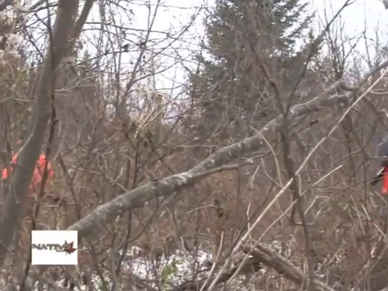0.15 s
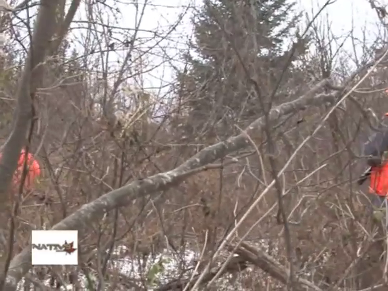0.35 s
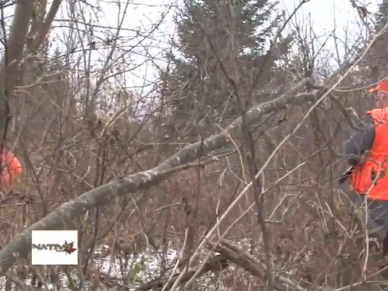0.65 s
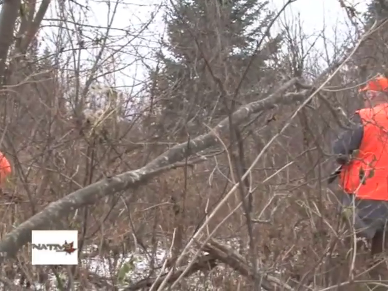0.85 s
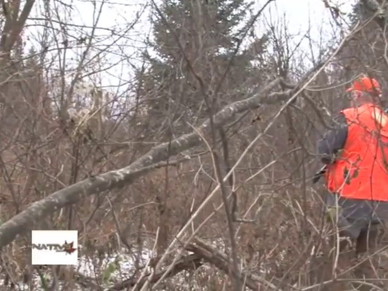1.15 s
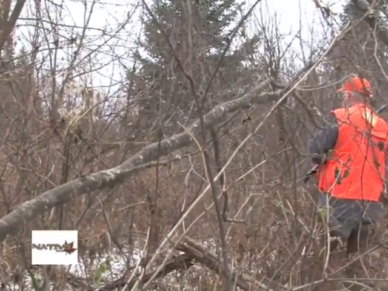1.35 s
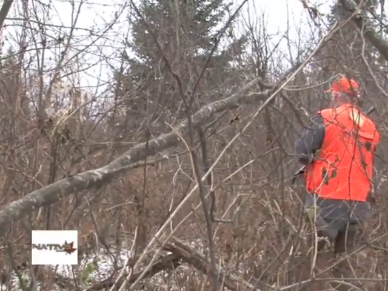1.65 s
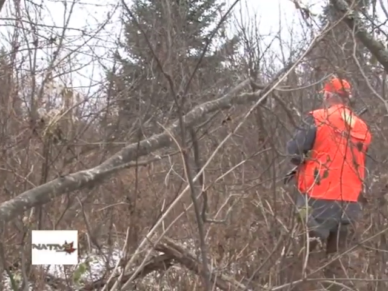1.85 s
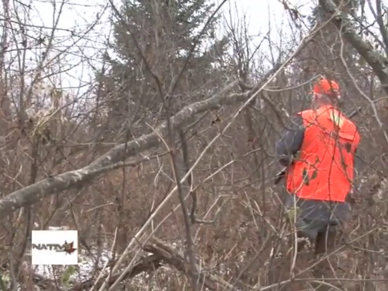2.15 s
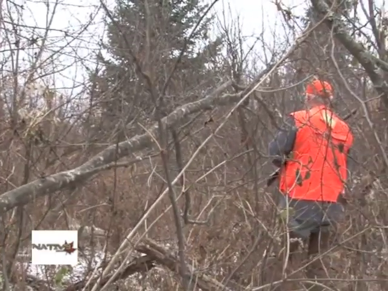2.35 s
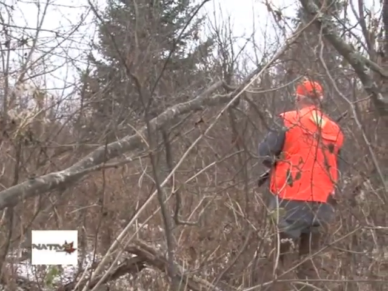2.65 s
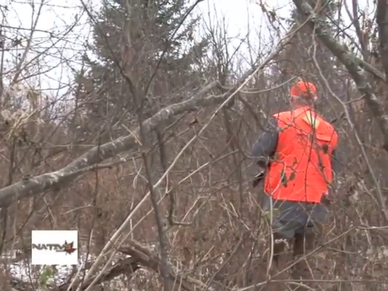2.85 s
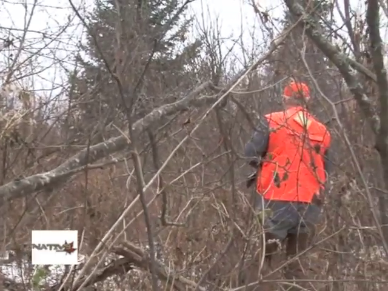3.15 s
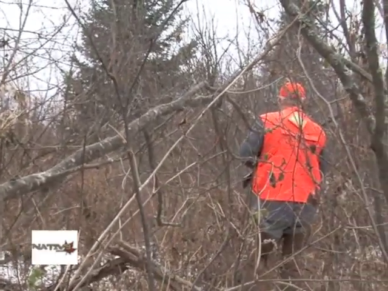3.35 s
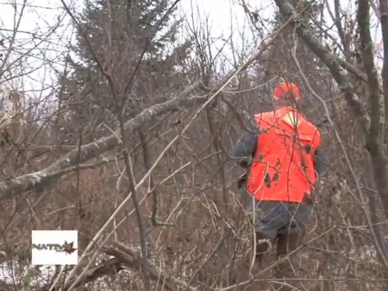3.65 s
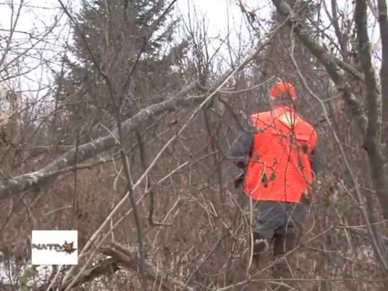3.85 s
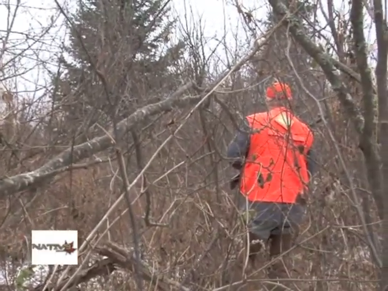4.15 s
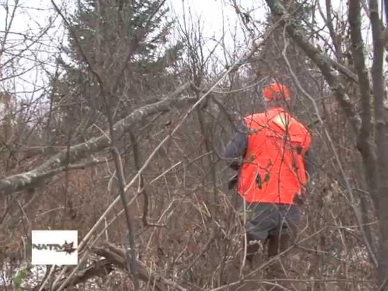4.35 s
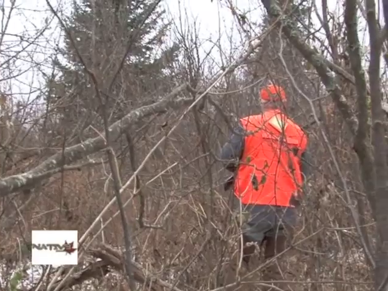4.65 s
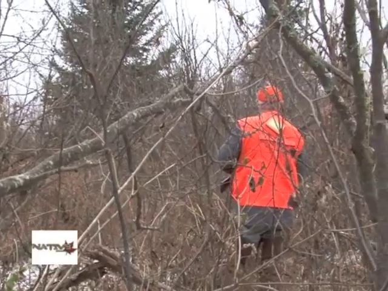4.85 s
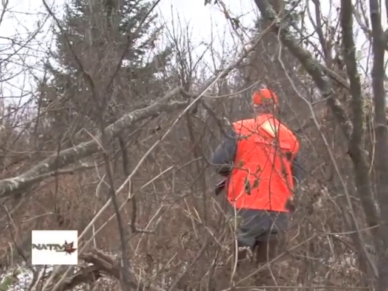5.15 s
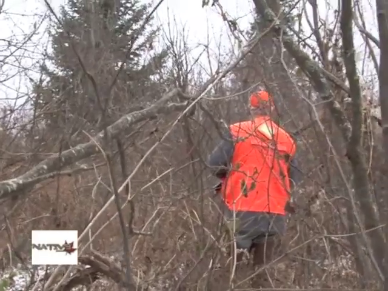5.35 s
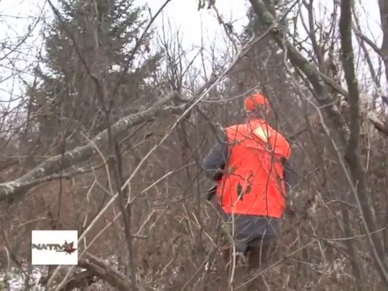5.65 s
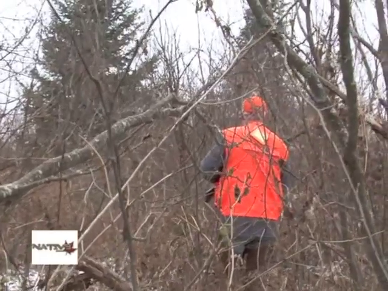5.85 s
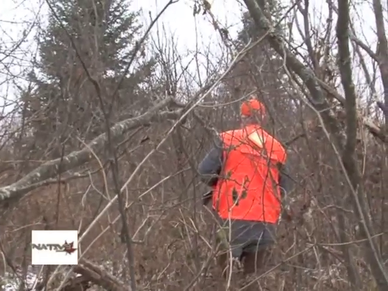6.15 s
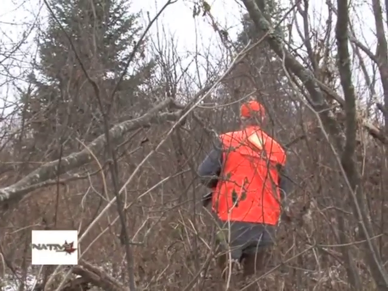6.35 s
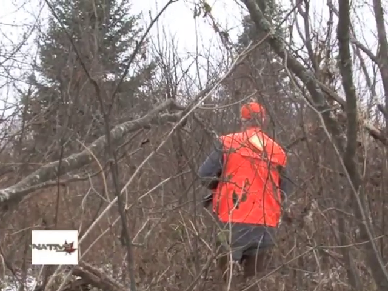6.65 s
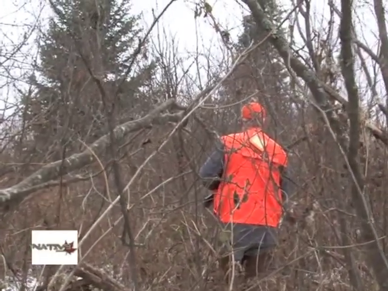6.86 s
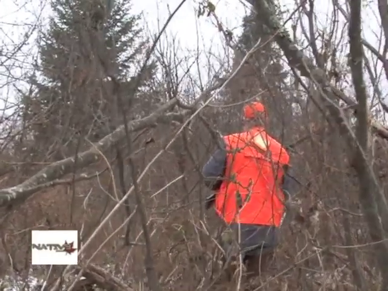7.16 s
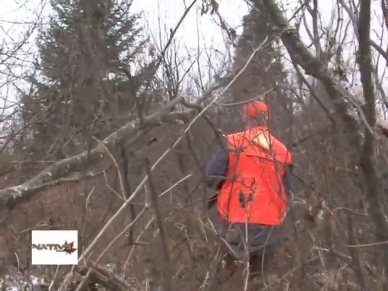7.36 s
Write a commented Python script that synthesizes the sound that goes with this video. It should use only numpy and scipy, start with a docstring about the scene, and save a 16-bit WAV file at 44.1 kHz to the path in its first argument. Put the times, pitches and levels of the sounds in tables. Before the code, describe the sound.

A soft, steady hush of air and a faint low rumble lie under a small bell worn by a dog in leafless woods. From 0 to 1.7 s the bell tinkles unevenly at moderate distance, with short metallic rings and hollow clacks; twigs snap near 0.7 and 1.5 s, and faint gliding chirps and a mid-pitched whirr pass around 0.8 to 1.5 s. From about 1.85 to 2.1 s the dog comes close: the bell clanks loudly and dry stems crackle densely. A sharp snap comes at 2.4 s, then another strong flurry of bell strikes at 2.7 to 2.9 s. After 3 s it moves away, leaving a gap near 3.7 to 4.2 s. From there to 7.5 s, thin, scattered tinkles echo off the trees, firmer near 4.8 and 6.35 s, among dull wood knocks, weak thuds, small snaps and light rustling.

```python
"""A dog wearing a small bell works through dry brush in leafless woods, over a soft hush of air and a low rumble.
At first the bell tinkles: clapper strikes ring decaying modes. Distant chirps glide and a whirr comes and goes.
About two seconds in the dog passes close by, and the bell and the crackle of tiny random fractures swell.
Then it moves off and the bell thins out. Throughout, noise bursts make the snaps of twigs,
wood knocks dully as damped tones, deep thuds swell in the rumble, and the trunks scatter the sounds as echoes."""
import sys
import numpy as np
from scipy import signal
from scipy.fft import rfft, irfft, next_fast_len
from scipy.io import wavfile
from scipy.ndimage import map_coordinates

SR = 44100
rng = np.random.default_rng(int(sys.argv[2]) if len(sys.argv) > 2 else 0)


def to_wav(s):
    """Save 16-bit WAV."""
    ch = np.atleast_2d(s).T  # columns
    pcm = np.round(np.clip(ch, -1, 1) * 32767)  # PCM
    wavfile.write(sys.argv[1], SR, pcm.astype(np.int16))


N = 331191
TIME = np.arange(N) / SR

# Levels in these tables are relative; each layer has its own trim.
# Colour of the steady air. Each row: frequency in Hz, level in dB.
AIR_COLOUR = [(25, -8.5), (80, -10), (176, -11.5), (300, -4.5), (470, -1.5), (800, -6.5), (1200, -10.5),
              (1700, -15.5), (3000, -20), (6000, -23.5), (10000, -34.5), (13500, -35), (15000, -42.5)]
# Colour of the low rumble. Each row: frequency in Hz, level in dB.
RUMBLE_COLOUR = [(20, -10), (50, -7.5), (78, 3.5), (120, -3.5), (220, -19)]
# Soft, deep thuds. Each row: start in seconds, length in seconds, level in dB.
THUDS = [(2.056, .035, -70), (2.574, .17, -70), (2.83, .035, -71), (3.11, .09, -64), (4.68, 0.046, -72),
         (5.34, 0.043, -68), (5.56, .06, -70), (5.75, 0.056, -68), (6.58, 0.031, -70), (6.92, 0.054, -72)]
# Spells of the faint whirr. Each row: start in seconds, length in seconds, level in dB.
WHIRR_SPELLS = [(.33, 0.21, -70), (.99, 0.56, -59.5), (3.08, 0.37, -63), (5.08, .63, -63),
                (7.2, .31, -64.5)]
# Colour of the whirr. Each row: frequency in Hz, level in dB.
WHIRR_COLOUR = [(800, -8), (1250, -12), (1650, 0.5), (1850, -5.5), (2300, -18.5)]
# Distant chirps, each one bent glide. Each row: start in seconds, length in seconds,
# first, middle and last pitch in Hz, level in dB.
CHIRPS = [(.838, 0.026, 1890, 1870, 1790, -60.5), (.869, 0.019, 1720, 1515, 1440, -49.5),
          (0.948, 0.029, 1440, 1430, 1520, -50), (0.967, 0.04, 1636, 1624, 1600, -49.5),
          (0.988, .028, 1650, 1352, 1140, -50), (1.342, 0.072, 1570, 1740, 1504, -61)]
# Dull woody knocks. Each row: start in seconds, level in dB.
KNOCKS = [(1.227, -43), (1.475, -44), (2.288, -44.5), (2.753, -43), (3.674, -43.5), (4.694, -46),
          (4.851, -40.5), (4.965, -45.5), (5.115, -40.5), (5.419, -39), (5.706, -43), (6.058, -42.5),
          (6.924, -51)]
# Modes of the knocked wood. Each row: frequency in Hz, level in dB, time to fall 60 dB in seconds.
WOOD_MODES = [(427, -2, 0.025), (530, 6, 0.034), (740, -7.5, 0.024), (896, -1.5, 0.036),
              (1350, -5.5, 0.023)]
# Twigs snapping. Each row: start in seconds, level in dB.
SNAPS = [(0.7244, -35), (0.734, -39), (0.884, -44), (1.517, -36), (1.58, -35), (2.0287, -32), (2.2054, -42),
         (2.439, -25), (3.119, -58), (3.4238, -34), (4.3475, -50), (4.581, -45), (4.8504, -49),
         (6.574, -43), (6.888, -45)]
# Colour of a snap. Each row: frequency in Hz, level in dB.
SNAP_COLOUR = [(500, -23.5), (1500, -17.5), (3000, -7.5), (5500, -2.5), (9000, -7.5), (14000, -28)]
# How loudly the dog pushes through the stems, greatest as it passes. Each row: time in seconds, level in dB.
PUSH = [(0.0, -73), (0.17, -80.5), (1.44, -77.5), (1.84, -69.5), (1.96, -58), (2.3, -65.5), (2.61, -63.5),
        (3.49, -73.5), (4.0, -84), (5.0, -80), (6.28, -83.5), (6.88, -78.5), (7.22, -83.5), (7.51, -84)]
# Single stems sweeping along its coat. Each row: middle in seconds, half length in seconds, level in dB.
SWISHES = [(0.72, 0.04, -70), (2.401, .015, -58), (2.656, 0.075, -58), (4.63, 0.053, -78.5),
           (6.89, 0.037, -76)]
# Colour of the crackling stems. Each row: frequency in Hz, level in dB.
STEM_COLOUR = [(700, -9.5), (1300, -5.5), (3000, -2), (5000, -1), (8000, -1.5), (10500, -8), (13000, -16.5),
               (15000, -23.5)]
# The dog's path. Each row: time in seconds, share scattered by the trees in dB, left over right in dB.
PATH = [(0, 2.5, 3), (1.3, -1.5, 2.5), (1.9, -6.5, 1.1), (2.8, -9, 0.7), (3.3, -0.5, 0.5), (4.3, -2, 1.5),
        (5.6, 7, 0), (6.3, 3, 1.5), (6.8, -2.5, 0.2), (7.5, -5, 3)]
# The clearer clapper strikes; where the clapper lands sets brightness and the second partial. Each row:
# start in seconds, ring in dB, clack above the ring in dB, brightness in dB, second partial in dB.
STRIKES = [(0.018, -48.5, 11.5, -4, 1), (0.116, -50.5, 8, -9, -3), (0.161, -57.5, -8, -8, 7),
           (0.234, -67.5, 26, 1, 12), (0.4448, -45.5, 12, 0.5, 0), (0.5018, -48, 5, -8, -1),
           (0.547, -52.5, 4, 2, 2), (0.6724, -52.5, -6, -2, -11), (0.72, -55.5, 5, -4, -4),
           (0.9208, -61, 5, -3, -4), (1.0183, -53.5, 14, -2, -10), (1.048, -53, -5, -13, 2),
           (1.1084, -53, -3, -6, -20), (1.185, -46, 11.5, -2, -4), (1.2521, -55.5, 15.5, -1, 6),
           (1.2891, -45.5, 7.5, -7.5, -1), (1.4622, -45, 1, 4.5, 3), (1.5635, -48, 8, 7, 8),
           (1.6471, -54, 15.5, -17, 13.5), (1.701, -47, 22.5, -1, 3), (1.7774, -46, 18.5, 7, -13),
           (1.7975, -47, 25, -7, 1), (1.821, -45.5, 11, 16, -5), (1.8816, -34, 16, -8, 4.5),
           (1.9006, -35.5, 20, -25, -16), (1.9055, -27.5, 14, -7, -0.5), (1.9435, -27.5, 6, -22, -9),
           (1.952, -32, 13.5, 9.5, 7), (2.0, -34, 17.5, -1, 8), (2.0698, -28, 5.5, -1, -10),
           (2.2598, -49.5, 26.5, -11, 12), (2.2838, -36, 9, -8.5, 5.5), (2.3708, -46.5, 18, 3, 10),
           (2.391, -36.5, 9, -14, -5), (2.5043, -53, 25, 23, 16.5), (2.601, -43.5, 16, -26.5, 9.5),
           (2.6836, -46.5, 12, -20, -1), (2.7055, -40.5, 9, -16, -8), (2.7411, -25.5, 10, -15.5, -3),
           (2.7761, -28.5, 12.5, -7, -5), (2.8205, -30, 18, -8.5, -1), (2.8488, -26, 11, -5.5, 0.5),
           (3.192, -45.5, -1, 13, 13.5), (3.234, -46, 12.5, 0.5, 4), (3.2808, -49, 9.5, 0.5, 4),
           (3.3993, -47.5, 14, -2, 8), (3.5092, -57.5, 11, -13, 8), (3.5903, -59, 21, 4, 10),
           (4.2421, -58.5, 12, -21, -10), (4.3473, -62.5, 17.5, 9, 5), (4.619, -61, 13.5, 8, 1),
           (4.791, -45, 10.5, 8, -1.5), (4.908, -50, 3, -5, -5), (4.9399, -54.5, 16.5, -8, 1),
           (5.0392, -57, 11, 8, -7), (5.251, -52.5, 5, -7.5, -11), (5.3141, -60, 17, -3, -3),
           (5.5096, -60, 11, 4.5, 5.5), (5.671, -54.5, 10, -9.5, -5), (5.8483, -66.5, 23.5, -22, -4),
           (6.0488, -59, 15.5, 0, 2), (6.245, -56.5, 8, -9, -7), (6.325, -46.5, 7.5, 0, -12),
           (6.362, -46.5, 7, 0, 1), (6.3808, -48.5, -8, -8, 0), (6.4188, -50.5, 8, -3, 3),
           (6.6115, -57, 11, -5, 1), (6.667, -49.5, 4.5, 4, 4), (6.951, -51, 3, -6, -13),
           (7.0465, -56.5, 14, 1, -11), (7.212, -55.5, 6, -16, -5)]
# The bell's modes in four families, lowest to highest; close pairs beat.
# Each row: frequency in Hz, level in dB, time to fall 60 dB in seconds.
LOWEST_MODES = [(2332, -23, 0.13), (2400, 1.5, 0.18), (2377, -14.5, 0.098)]
SECOND_MODES = [(4054, -0.5, 0.023), (4038, -0.5, 0.18)]
UPPER_MODES = [(5370, -3, .05), (5460, -1, .16), (5530, -5, .07), (5603, -4, .22), (6193, -11, .18),
               (6805, -12, .06), (6840, -7, .19)]
TOP_MODES = [(8735, -1, .13), (8812, -3, .11), (9685, -3, .11), (9765, -4, .1), (10420, -3, .11),
             (10510, -7, .05), (10772, -7, .11), (11640, -7, .1), (11890, -9, .1), (12890, -18, .08),
             (13585, -12, .09)]
# Colour of the clapper's short, hollow clack. Each row: frequency in Hz, level in dB.
CLACK_COLOUR = [(900, -62.5), (1550, -30.5), (1720, -18.5), (1850, -0.5), (2050, 2), (2350, 6), (2650, -10),
                (3000, -23), (4600, -25), (5400, -2.5), (6000, -16), (10000, -29), (14000, -40)]

HUSH_DB, RUMBLE_DB = -62.5, -84
HUSH_FOLLOWS = 0.098  # lift of the hush while the dog is near, dB per dB of push
THUD_ATTACK_S, THUD_RELEASE_S = 0.017, 0.03
WHIRR_ATTACK_S, WHIRR_RELEASE_S = 0.03, 0.14
SNAP_T60_S, STICK_T60_S = 0.012, 0.005
FRACTURES_PER_S, FRACTURE_SPREAD_DB = 2200, 2.8
SURGE_DB, SURGES_PER_S = 1, 18  # the rustle comes in uneven surges
RING_RISE_S = 0.00031  # a struck body takes a moment to ring fully
# how far each family of modes moves with a strike's brightness, dB per dB
LOWEST_TILT, UPPER_TILT, TOP_TILT = -0.5, 0.27, 0.3
ROLL_DB = -66.5  # light clapper touches at the dog's mean effort, before the modes' own levels
ROLL_FOLLOWS = 0.27  # dB per dB of effort
CUTOFF_HZ = 15000


def from_db(db):
    """Decibels to gain."""
    return 10 ** (np.asarray(db) / 20)


def rms_one(x):
    """Scale to unit rms."""
    return x / np.sqrt(np.mean(x ** 2) + 1e-20)


def in_time(rows):
    """Each column of a curve at every sample."""
    s, *columns = np.transpose(rows)
    return [np.interp(TIME, s, column) for column in columns]


def lowpass(x, order, hz):
    """Smooth roll-off above a frequency."""
    return signal.sosfilt(signal.butter(order, hz, fs=SR, output="sos"), x)


def highpass(x, order, hz):
    """Smooth roll-off below a frequency."""
    return signal.sosfilt(signal.butter(order, hz, "high", fs=SR, output="sos"), x)


def colour(x, spectrum, size=8192):
    """Causal (minimum-phase) filter with the given spectrum, falling away beyond its ends."""
    hz, db = np.transpose(spectrum)
    log_hz, at = np.log(np.arange(size // 2 + 1) * SR / size + 1), np.log(hz)
    outside = np.abs(log_hz - np.clip(log_hz, at[0], at[-1]))
    target_db = np.interp(log_hz, at, db) - 20 * outside
    # folding the cepstrum forward in time gives minimum phase
    cepstrum = irfft(np.log(from_db(target_db)))
    cepstrum[1:size // 2] *= 2
    cepstrum[size // 2 + 1:] = 0
    response = irfft(np.exp(rfft(cepstrum)))
    return signal.oaconvolve(x, np.array(response, ndmin=x.ndim), axes=-1)[..., :N]


def drift(rate):
    """Slow random wander of unit rms, with this many turning points a second."""
    knots = rng.standard_normal(8000)
    return rms_one(np.interp(TIME * rate, np.arange(len(knots)), knots))


def fade(t60, size):
    """Exponential decay, down 60 dB after t60 seconds."""
    return np.exp(-np.log(1000) * TIME[:size] / t60)


def add(track, s, sound):
    """Mix a sound into a track at time s."""
    at = max(round(s * SR), 0)
    track[at:at + len(sound)] += sound[:max(N - at, 0)]


def spells(rows, attack_s, release_s):
    """Gain over time in which each spell rises, holds and falls."""
    gain = np.zeros(N)
    for s, length, db in rows:
        rise = (TIME - s) / attack_s
        fall = 1 - (TIME - s - length) / release_s
        gain += from_db(db) * np.clip(np.minimum(rise, fall), 0, 1)
    return gain


def stereo(mid, side, side_db):
    """Left and right from a common and an opposed part."""
    return mid + from_db(side_db) * side * np.array([[1], [-1]])


def noise(spectrum, side_db):
    """Coloured stereo noise of unit rms."""
    mid, side = colour(rng.standard_normal((2, N)), spectrum)
    return rms_one(stereo(mid, side, side_db))


def burst(t60, size=4000):
    """A contact that chatters briefly: decaying noise of unit energy."""
    chatter = rng.standard_normal(size) * fade(t60, size)
    return chatter / np.linalg.norm(chatter)


def ring(modes, uneven_db, detune, size=11000):
    """One blow sets each mode ringing, with chance strength, sign and tuning."""
    hz, db, t60 = np.transpose(modes)
    strength = from_db(db + uneven_db * rng.standard_normal(len(hz))) * rng.choice([-1, 1], len(hz))
    turning = np.float32(2 * np.pi * hz * (1 + detune * rng.standard_normal(len(hz))))
    dying, t = np.float32(np.log(1000) / t60), np.float32(TIME[:size])
    rise = 1 - np.exp(-t / RING_RISE_S)
    decays = np.exp(-np.minimum(np.outer(dying, t), 20))
    return rise * (strength @ (np.sin(np.outer(turning, t)) * decays))


def effort():
    """The dog's stir in the brush, in dB about its mean."""
    db, = in_time(PUSH)
    return db - db.mean()


def hush_of_air():
    """Soft steady noise that lifts a little as the dog stirs harder."""
    return from_db(HUSH_DB + HUSH_FOLLOWS * effort()) * noise(AIR_COLOUR, side_db=-4.5)


def rumble_and_thuds(thud_db):
    """Low, nearly central noise that swells briefly for each deep thud."""
    level = from_db(RUMBLE_DB) + from_db(thud_db) * spells(THUDS, THUD_ATTACK_S, THUD_RELEASE_S)
    return level * noise(RUMBLE_COLOUR, side_db=-18)


def whirr(whirr_db):
    """Mid-pitched noise that comes and goes in spells."""
    level = from_db(whirr_db) * spells(WHIRR_SPELLS, WHIRR_ATTACK_S, WHIRR_RELEASE_S)
    return level * noise(WHIRR_COLOUR, side_db=-4.5)


def background(thud_db, whirr_db):
    """Air, rumble and whirr together, leaning to the right."""
    bed = hush_of_air() + rumble_and_thuds(thud_db) + whirr(whirr_db)
    return bed * from_db(1.53 * np.array([[-1], [1]]))


def chirps(waver):
    """Thin whistles that swell and fade as they glide through three pitches."""
    out = np.zeros(N)
    unsteady = 1 + waver * drift(240)
    for s, length, first, middle, last, db in CHIRPS:
        along = np.linspace(0, 1, int(length * SR))
        bend = np.polyfit([0, 0.5, 1], [first, middle, last], 2)
        hz = np.polyval(bend, along) * unsteady[int(s * SR):][:len(along)]
        swell = np.sin(np.pi * along)
        add(out, s, from_db(db) * swell * np.sin(2 * np.pi * np.cumsum(hz) / SR))
    return out


def woods(x, early_t60, late_t60, late_db, dull_hz, size=32000, count=4):
    """Nearby stems scatter at once, far trunks return a weak, duller tail; the echo patterns shift by chance."""
    out, t = np.zeros((2, N)), TIME[:size]
    shares = np.array([drift(7) for _ in range(count)])
    for share in shares / np.linalg.norm(shares, axis=0):
        early = rng.standard_normal((2, size)) * fade(early_t60, size) * (t > 0.003)
        late = rng.standard_normal((2, size)) * fade(late_t60, size) * (1 - fade(0.11, size))
        mid, side = early + from_db(late_db) * lowpass(late, 1, dull_hz)
        echoes = stereo(mid, side, side_db=-6.0) / np.linalg.norm(mid)
        out += signal.fftconvolve((share * x)[None], echoes, axes=1)[:, :N]
    return out


def woody_knocks(knock_db, wood_db, crack_hz, wood_hz, sink_s):
    """A knock starts as a high crack and sinks at once to the dull note of the wood, whose modes ring."""
    knocks = np.zeros(N)
    decay = fade(0.026, size=4000)
    sink = np.exp(-TIME[:len(decay)] / sink_s)
    for s, db in KNOCKS:
        hz = wood_hz * from_db(1.5 * rng.normal()) + crack_hz * sink
        add(knocks, s, from_db(db + knock_db) * decay * np.sin(2 * np.pi * np.cumsum(hz) / SR))
        add(knocks, s + 0.002, from_db(db + wood_db) * ring(WOOD_MODES, uneven_db=2.0, detune=0.06))
    return highpass(knocks, 2, 330)


def snapping_twigs(snap_db):
    """Thin twigs snap brightly: each is a very short burst of coloured noise."""
    snaps = np.zeros(N)
    for s, db in SNAPS:
        add(snaps, s, from_db(db + snap_db) * burst(SNAP_T60_S))
    return colour(snaps, SNAP_COLOUR)


def brush(per_s, spread_db, sticks_per_s, stick_db, body_db, crisp_db, swish_db, split_hz):
    """Clumps of tiny fractures in dry leaves, with lone, larger ticks as stems give way."""
    push = from_db(in_time(PUSH)[0])
    for s, half, db in SWISHES:
        push += from_db(db + swish_db) * np.exp(-((TIME - s) / half) ** 2)
    # a wandering fracture rate makes the clumps
    born = rng.random((2, N)) < per_s * from_db(4 * drift(45)) / SR
    sizes = from_db(spread_db * np.minimum(rng.exponential(1, (2, N)), 5))
    leaves = rms_one(born * sizes * rng.choice([-1, 1], (2, N)))
    tick_sizes = from_db(3.9 * np.clip(rng.standard_normal(N), -2, 2))
    ticks = (rng.random(N) < sticks_per_s / SR) * tick_sizes
    sticks = from_db(stick_db) * rms_one(signal.fftconvolve(ticks, burst(STICK_T60_S))[:N])
    grains = rms_one(colour(stereo(*leaves, side_db=-21) + sticks, STEM_COLOUR))
    body = lowpass(grains, 1, split_hz)
    crisp = grains - body
    push *= from_db(SURGE_DB * drift(SURGES_PER_S))
    return push * (from_db(body_db) * body + from_db(crisp_db) * crisp)


def swing(x, travel_m, rate):
    """The bell is jolted to and fro, so its changing distance bends the pitch a little."""
    delay = travel_m * drift(rate) / 343  # speed of sound, m/s
    return map_coordinates(x, [(TIME - delay) * SR], order=3)


def flutter(x, depth, rate):
    """Ever-changing paths through the stems smear the partials by random shifts of level and phase."""
    analytic = signal.hilbert(x, next_fast_len(N))[:N]
    wandering = analytic.real * drift(rate) + analytic.imag * drift(rate)
    return (x + depth * wandering) / np.sqrt(1 + 2 * depth ** 2)


def rolling_clapper(per_s, spread_db, second_db, upper_db, top_db, clack_db):
    """Light chance touches, firmer as the dog pushes harder, keep the shell astir between the strikes."""
    touch_db = ROLL_DB + ROLL_FOLLOWS * effort() + spread_db * rng.standard_normal(N)
    touches = (rng.random(N) < per_s / SR) * from_db(touch_db)
    shell = ring(LOWEST_MODES, 0, 0) + from_db(second_db) * ring(SECOND_MODES, 0, 0)
    shell += from_db(upper_db) * ring(UPPER_MODES, 0, 0) + from_db(top_db) * ring(TOP_MODES, 0, 0)
    return signal.oaconvolve(touches, shell)[:N] + from_db(clack_db) * colour(touches, CLACK_COLOUR)


def bell(lowest_db, second_db, upper_db, top_db, clack_db, bounce_db, damp_db):
    """Each strike clacks and rings the shell; the clapper bounces, and its next blow damps the old ring."""
    shell, clacks = np.zeros(N), np.zeros(N)
    gaps = np.diff([row[0] for row in STRIKES] + [TIME[-1] + 1])
    for (s, db, clack, bright, second), gap in zip(STRIKES, gaps):
        tone = from_db(lowest_db + LOWEST_TILT * bright) * ring(LOWEST_MODES, uneven_db=-0.5, detune=0.0012)
        tone += from_db(second_db + second) * ring(SECOND_MODES, uneven_db=1.0, detune=0.0016)
        tone += from_db(upper_db + UPPER_TILT * bright) * ring(UPPER_MODES, uneven_db=2.5, detune=0.0019)
        tone += from_db(top_db + TOP_TILT * bright) * ring(TOP_MODES, uneven_db=2.5, detune=0.0044)
        damping_db = np.interp(TIME[:len(tone)], [gap, gap + 0.0053], [0, damp_db])
        add(shell, s, tone * from_db(db + damping_db))
        contact = from_db(db + clack + clack_db)
        add(clacks, s, contact * burst(t60=0.026))
        for delay in rng.uniform(0.0032, 0.029, 2):
            add(clacks, s + delay, contact * from_db(bounce_db) * burst(t60=0.032))
    # so small a shell radiates nothing low
    return highpass(shell + colour(clacks, CLACK_COLOUR), 8, 1720)


def scene():
    """The farther the dog, the more of its bell arrives by way of the trees."""
    scattered_db, pan_db = in_time(PATH)
    bed = background(thud_db=-1.0, whirr_db=-4.0)
    small = chirps(waver=0.0164) + snapping_twigs(snap_db=18.5)
    small += woody_knocks(knock_db=-5.5, wood_db=-8.0, crack_hz=3430, wood_hz=494, sink_s=0.001105)
    stems = brush(per_s=FRACTURES_PER_S, spread_db=FRACTURE_SPREAD_DB, sticks_per_s=61, stick_db=-10.0,
                  body_db=9, crisp_db=8.5, swish_db=-1.5, split_hz=6300)
    collar = bell(lowest_db=1.88, second_db=-4.5, upper_db=-1.5, top_db=-13.0,
                  clack_db=24.5, bounce_db=-20.0, damp_db=-6.5)
    collar += rolling_clapper(per_s=30, spread_db=3.0, second_db=-7.5, upper_db=-7.5, top_db=-19.5, clack_db=27.5)
    direct = flutter(collar, depth=0.12, rate=220)
    smeared = flutter(swing(collar, travel_m=0.022, rate=45), depth=0.6, rate=170)
    to_trees = smeared * from_db(scattered_db) + small * from_db(-6.5)
    echoes = woods(to_trees, early_t60=0.14, late_t60=0.62, late_db=-14.0, dull_hz=5000)
    # half the left-right difference goes to each side
    dog = (direct + stems + echoes) * from_db(pan_db * np.array([[0.5], [-0.5]]))
    return dog + small + bed


def record(dry):
    """The top is cut steeply."""
    return signal.sosfilt(signal.ellip(10, 0.1, 80, CUTOFF_HZ, fs=SR, output="sos"), dry)


dry = scene()
out = record(dry)
to_wav(out)
```